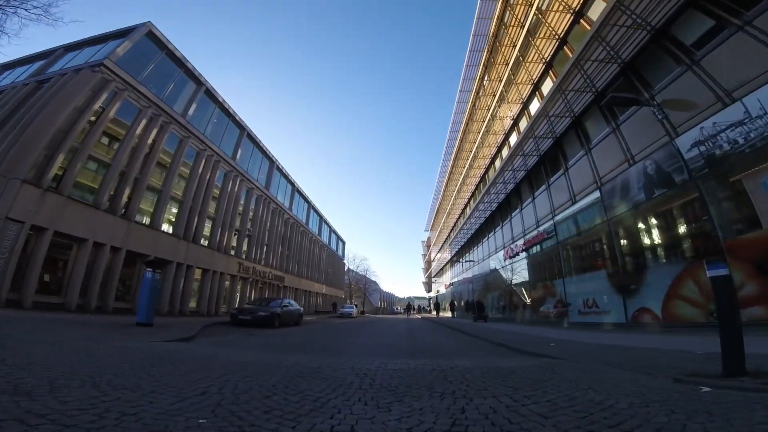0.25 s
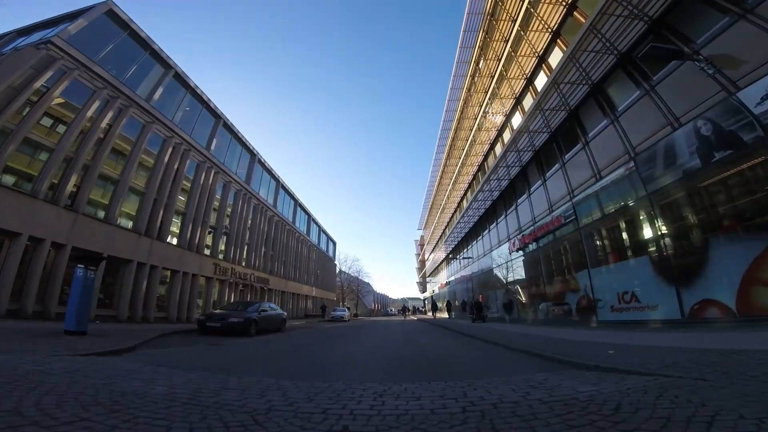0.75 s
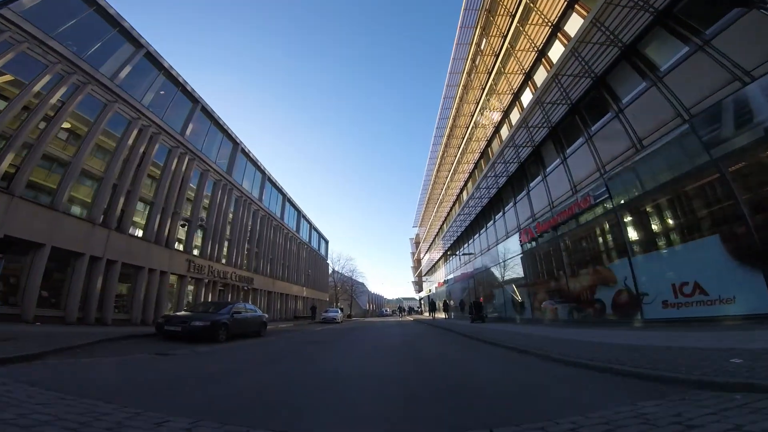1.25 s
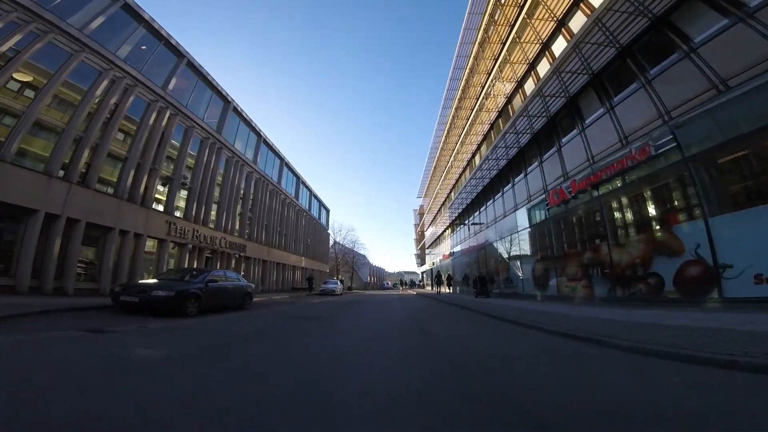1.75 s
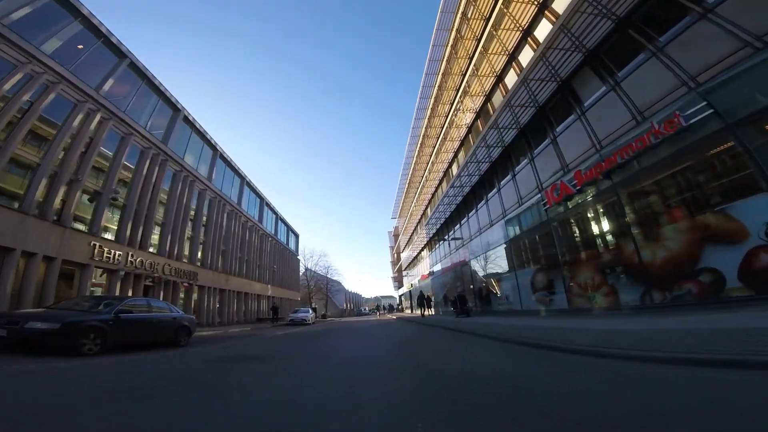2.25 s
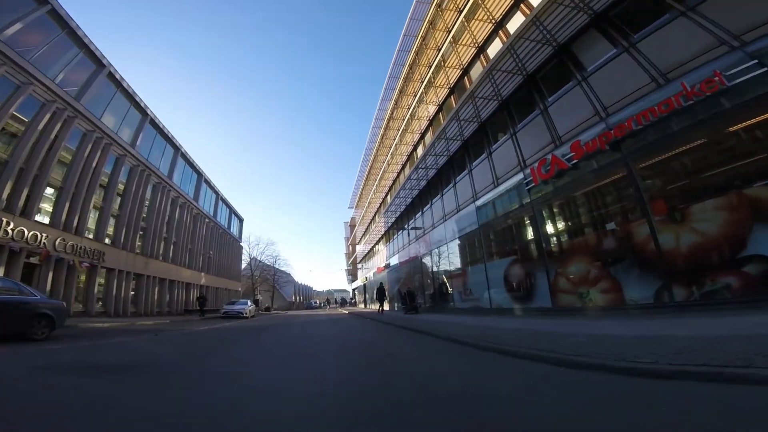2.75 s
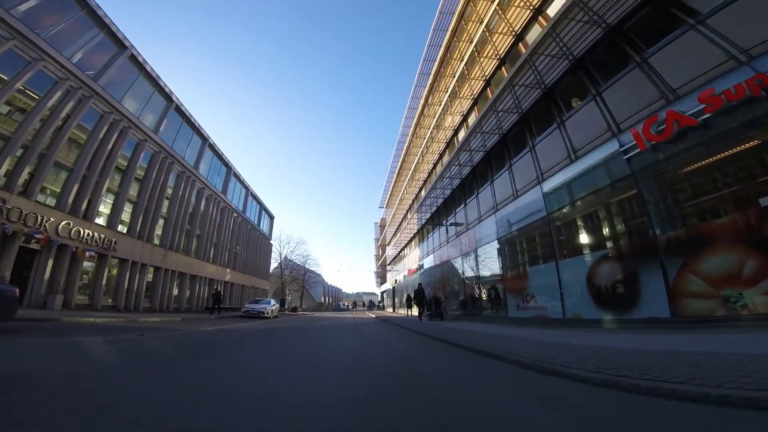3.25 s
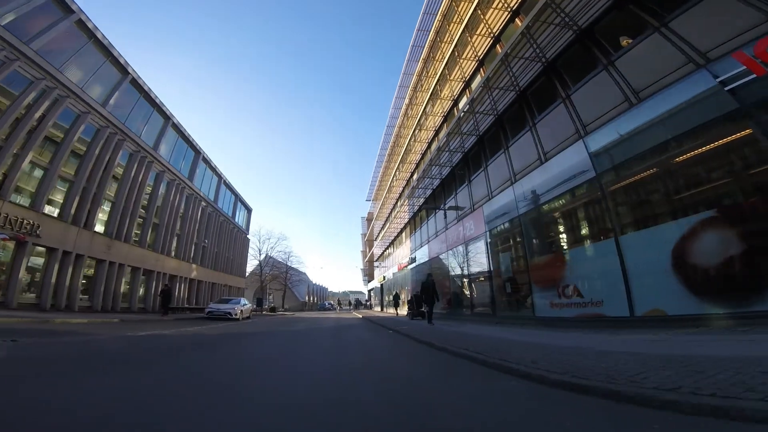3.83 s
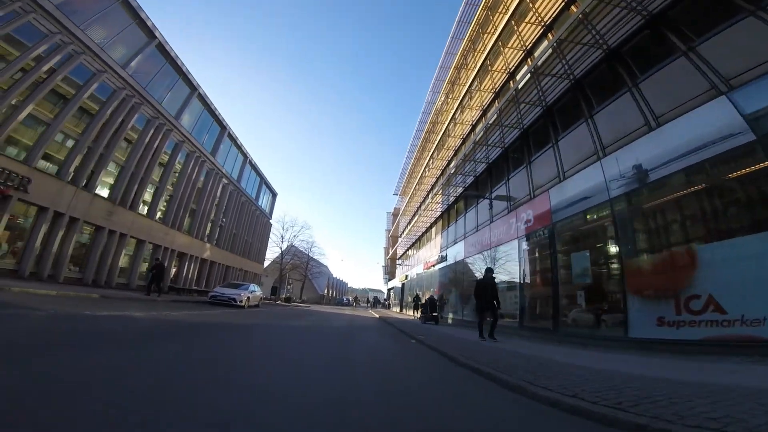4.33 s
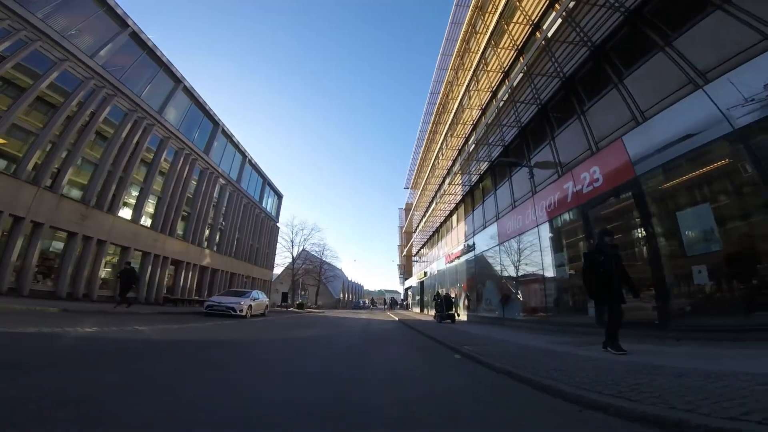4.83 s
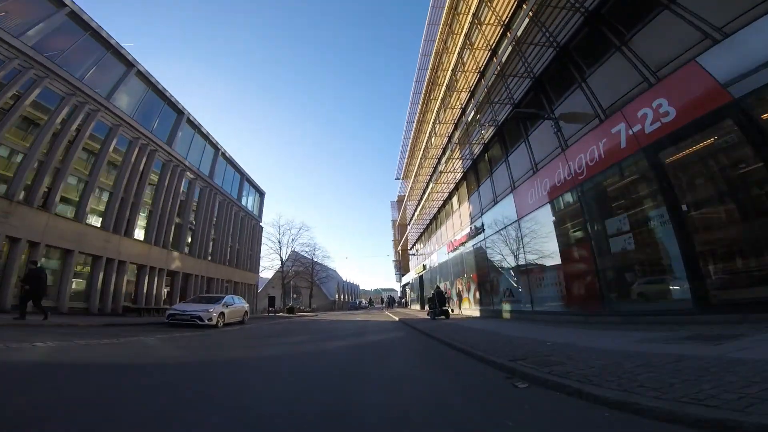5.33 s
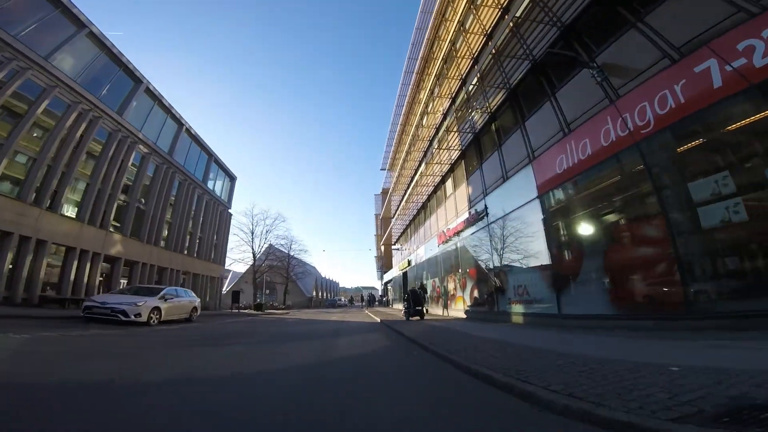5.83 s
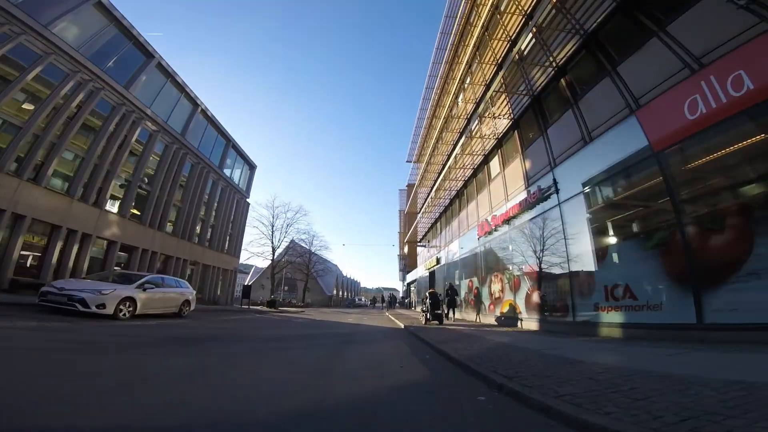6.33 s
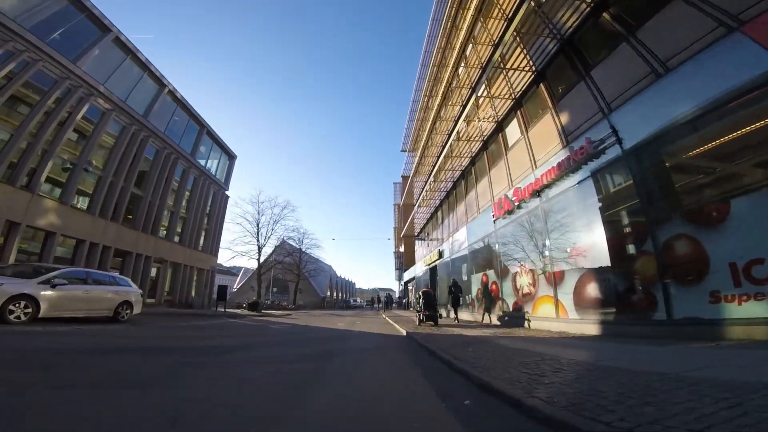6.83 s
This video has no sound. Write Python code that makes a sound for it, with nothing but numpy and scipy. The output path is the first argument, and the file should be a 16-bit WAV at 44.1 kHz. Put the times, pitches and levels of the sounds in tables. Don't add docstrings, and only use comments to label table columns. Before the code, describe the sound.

Muffled, bass-heavy bike ride outdoors, mono and very close. Cobblestones jolt the tyre in irregular deep thumps while the frame buzzes and cables and chain tick. After about two seconds the jolts stop, and smooth rolling rumble with a wavering low tread hum continues, wind softer, slightly louder rolling with speed, punctuated by a few hard clicks of grit on the frame.

```python
import sys
import numpy as np
from scipy import signal
from scipy.io import wavfile
from scipy.ndimage import uniform_filter1d

SR = 44100
rng = np.random.default_rng(int(sys.argv[2]) if len(sys.argv) > 2 else 0)


def volts_from_decibels(level):
    exponent = np.asarray(level, float) / 20
    return 10 ** exponent


def dump(signal):
    limited = np.clip(np.atleast_2d(signal).T, -1, 1)
    pcm = np.round(limited * 32767).astype(np.int16)
    wavfile.write(sys.argv[1], SR, pcm)


N = 312228

# (time [s], level [dB])
GUSTS = [(0.0, -24), (0.49, -24.5), (0.51, -20), (1.01, -25), (1.06, -26), (1.14, -22), (2.13, -24.5),
         (2.29, -37), (3.98, -38), (4.12, -25.5), (4.77, -33), (5.19, -32), (5.54, -33), (5.58, -27.5),
         (6.53, -32.5), (6.56, -25), (6.62, -31), (7.08, -32.5)]
# (time [s], block rate [Hz], level [dB])
TREAD = [(0, 120, -35), (.3, 116.8, -22), (.55, 122, -23.5), (.75, 122.3, -62.5), (2.8, 110.6, -62),
         (3.1, 107.8, -29.5), (3.4, 108.7, -26), (3.65, 111.1, -44), (3.9, 112.5, -22), (4.3, 112.8, -37.5),
         (4.8, 113.8, -31), (5.15, 118.6, -23.5), (5.5, 120, -35), (5.95, 120.6, -36), (6.5, 124.2, -26),
         (6.8, 128.7, -43), (7.08, 123.4, -24.5)]
# (time [s], rumble level [dB])
WHEEL_LOAD = [(0.0, -24), (0.41, -21.5), (0.99, -21.5), (1.06, -20), (1.73, -21), (1.79, -22.5),
              (1.85, -24), (1.93, -25), (2.31, -18), (2.33, -22.5), (2.76, -22), (2.86, -31), (2.96, -24.5),
              (5.36, -24), (5.38, -26), (6.88, -19.5), (6.96, -30.5), (7.08, -17)]
# (time [s], surge [dB])
BUMPS = [(.03, 4), (.15, 5.5), (.41, 5), (.57, 3.5), (.68, 3), (.79, 1.5), (1.159, 6.5), (1.25, 1),
         (1.35, 2.5), (1.46, 5.5), (1.7, 2.5), (1.931, 4.5), (2.09, 6.5), (2.212, 8), (3.19, 0.5),
         (4.49, 0.5), (5.049, 1), (5.48, 0.5), (5.82, 1), (6.05, 1), (6.23, 1.5), (6.58, 2.5), (6.8, 1.5)]
# (time [s], surge [dB])
SWELLS = [
    (.08, 2),
    (.73, 2.5),
    (1.1, 2.5),
    (1.21, 3.5),
    (1.32, 3),
    (1.42, 1),
    (1.99, 1),
    (2.12, -2),
    (5.82, 2),
    (6.53, 2),
]
# (frequency [Hz], width [Hz], peak level [dB])
TYRE_MODES = [(77.6, 30, -6), (95.5, 26.6, 0), (120, 33, 1), (148.9, 23.6, -2)]
# (frequency [Hz], width [Hz], peak level [dB])
WALL_MODES = [(184, 61, 0), (234, 53, 0), (297.8, 40.6, -0.5), (348, 60, -4.5), (390.5, 42.6, -8.5)]
# (frequency [Hz], width [Hz], peak level [dB])
FRAME_MODES = [(484.2, 49, 0), (527.7, 35.3, 4), (566.8, 48, 0), (715, 150, -8), (806, 61, -6),
               (847, 360, -13.5), (1250, 700, -19.5), (1800, 1400, -23.5), (2253, 590, -23),
               (3080, 1470, -30.5)]
# (frequency [Hz], width [Hz], peak level [dB])
HOUSING_MODES = [(5150, 1300, 0), (6500, 610, 1.5), (7270, 2100, -7.5), (8250, 1800, -13.5)]
# (frequency [Hz], width [Hz], peak level [dB])
AIR_MODES = [(8660, 2000, -5), (11600, 1600, -11), (13000, 2000, -13)]
# (level [dB], extra on cobbles [dB], gain with speed [dB/s], share of each bump [ratio])
WALL_LAW = (-35.5, 1.5, 0.95, 0.98)
FRAME_LAW = (-48.5, 3.5, 1, 1.01)
ROLL_LAW = (-60, 1.5, 1.32, 0.97)
HOUSING_LAW = (-63, -0.5, 0.59, 1.14)
# (time [s], peak [dB], low modes [dB], centre [Hz])
PINGS = [(.0114, -26.5, 7, 1470), (.395, -32.5, -16, 1760), (1.1113, -27.5, 1, 1800),
         (2.0344, -27.5, 8, 1390), (2.574, -26.5, 0.5, 1280), (2.7994, -26.5, 7.5, 1780),
         (3.0894, -48, -7, 1530), (4.5272, -16.5, 1, 1769), (5.0978, -19, -2, 2065),
         (5.8818, -39, 12, 1430), (6.3034, -27.5, 3.5, 1820), (6.789, -31.5, -5, 1760)]
# (time [s], peak [dB])
THUDS = [(.049, -13), (0.092, -12.5), (.434, -13), (.518, -11), (.558, -8), (0.652, -12), (0.673, -8),
         (0.765, -10.5), (1.081, -6), (1.142, -14), (1.163, -6.5), (1.188, -17), (1.403, -12), (1.462, -13),
         (1.543, -9), (1.684, -14), (1.777, -6.5), (1.932, -11), (2.044, -18), (2.061, -13), (2.202, -11),
         (2.288, -19.5), (7.054, -18)]
# (time [s], peak [dB], frame modes [dB], centre [Hz])
RATTLES = [(.06, -40.5, 2, 6560), (.088, -35, 2, 5360), (.19, -34, -6, 5300), (0.299, -38, -4, 4940),
           (.357, -49, 6, 6440), (0.428, -35.5, -2, 5470), (0.495, -38, 3, 5500), (0.723, -43, 1, 4750),
           (.745, -43.5, -6, 5270), (1.143, -39, 1, 6480), (1.162, -48.5, -17, 5450),
           (1.578, -42.5, 4, 6490), (1.7414, -41.5, 5, 5240), (1.902, -41, 2, 5160), (1.9306, -31, 4, 5400),
           (1.957, -43, 1, 6500), (1.9839, -46, -10, 5150), (2.017, -47, 11.5, 6540),
           (2.1141, -43.5, 9, 5330), (2.188, -46, -7, 6740), (2.202, -40, 6, 5500), (2.696, -36, -3, 6100),
           (3.58, -44, -18, 5610), (4.51, -43, 1, 5060), (4.56, -47, -13, 6490), (5.494, -42.5, -16, 6620),
           (6.072, -48, -2, 5260), (6.121, -47, 9, 5270), (6.364, -43, -2, 6910), (6.915, -47.5, -15, 5600)]
# (time [s], peak [dB], low modes [dB], centre [Hz])
KNOCKS = [(.1527, -52, 18, 1340), (.2406, -57, 11, 1430), (.351, -31, 5.5, 1710), (.426, -30, -10, 2110),
          (.4957, -40, 14.5, 1660), (.6924, -39, 8.5, 1290), (.7904, -39.5, 10, 1250),
          (.925, -43, -14, 2500), (1.029, -38, -15, 2500), (1.0555, -50, 21, 1290), (1.1377, -47, 4, 1910),
          (1.354, -38, -7, 2500), (1.4107, -34.5, 4, 2400), (1.454, -28, 7, 1280),
          (1.5508, -35.5, -3, 1370), (1.5797, -33, 7, 1500), (1.678, -35, 2, 2090), (1.915, -36, -15, 2400),
          (1.9289, -29, 13.5, 1800), (1.9427, -23.5, 8.5, 1340), (2.0192, -35, 17, 2450),
          (2.109, -28.5, 10, 1600), (2.1966, -30, 4, 1250), (2.2544, -37.5, 7, 1250),
          (2.269, -33.5, 6, 1370), (2.436, -37, -5, 1260), (.967, -43, -9, 2300), (3.9994, -50, 16, 1297),
          (5.5154, -41.5, 15.5, 1321), (6.022, -35, -7, 2300)]
# (frequency [Hz], level [dB], t60 [s])
PING_MID = [(1130, -8, 0.013), (1326, -5.5, 0.027), (1760, -2.5, 0.019), (2030, -9.5, .065),
            (1950, -4.5, .01), (2450, -6, .015), (2840, -16, .012)]
# (frequency [Hz], level [dB], t60 [s])
RATTLE_MID = [(2140, -3.5, 0.011), (2550, 1.5, 0.013), (3180, -6, 0.013)]
RATTLE_HIGH = [(4060, -3.5, 0.0056), (5200, -12, .012), (5490, 11, 0.004), (5700, -9, 0.0059),
               (6540, 6, 0.0081), (7120, -1.5, .012), (8240, -8, 0.0023), (8750, -4, 0.012)]
# (frequency [Hz], level [dB], t60 [s])
KNOCK_LOW = [(418, -1, 0.022), (541, 0.5, 0.084), (729, -2.5, 0.05), (845, 2.5, 0.028), (902, -5, 0.014),
             (1005, -15, 0.039)]
KNOCK_MID = [(1120, -16, 0.017), (1340, -3, 0.026), (1550, -13, 0.019), (1804, -3, 0.016),
             (2013, -12.5, 0.045), (1950, -8, 0.0022), (2450, -6, 0.018), (2760, -22, 0.0096)]
KNOCK_HIGH = [(3355, 5, 0.01), (3740, 5, 0.0088), (4570, -2.5, 0.013), (5050, 4.5, 0.019),
              (6400, 1.5, 0.014)]

COBBLES_END_S, COBBLES_FADE_S = 1.65, 0.058
BUMP_RISE_S, BUMP_FALL_S = 0.1, 0.091
THUD_HZ, THUD_T60_S, THUD_CONTACT_S = 99.7, 0.043, 0.0037
RATTLE_S, RATTLE_FADE_DB = .011, 7
STREAK_FROM_HZ, STREAK_FULL_HZ, STREAK_DB, STREAK_S = 7000, 10000, 12, .055
OVERLOAD_TOP, BASS_CUT_HZ = .65, 12


def rms_one(x):
    return x / np.sqrt(np.mean(x ** 2) + 1e-20)


def in_time(rows):
    s, *columns = np.transpose(rows)
    return [np.interp(np.arange(N) / SR, s, c) for c in columns]


def drift(rate):
    r = np.exp(-80 * np.pi * rate / SR)
    noise = rng.standard_normal(N // 40 + 2002)
    slow = signal.lfilter([1], [1, -2 * r, r * r], noise)[2000:]
    return np.interp(np.arange(N) / 40, np.arange(len(slow)), rms_one(slow))


def wind():
    (gust_db,) = in_time(GUSTS)
    band = signal.butter(2, [14, 62], "band", fs=SR, output="sos")
    eddies = signal.sosfilt(band, rng.standard_normal(N + SR))[SR:]
    return volts_from_decibels(gust_db) * rms_one(eddies)


def tread():
    hz, level_db = in_time(TREAD)
    phase = 2 * np.pi * np.cumsum(hz + .9 * drift(5)) / SR
    return np.sqrt(2) * volts_from_decibels(level_db + 0.29 * drift(1.3)) * np.sin(phase)


def bumps(rows):
    t = np.arange(N) / SR
    return sum(surge * np.interp(t, [s - BUMP_RISE_S, s, s + BUMP_FALL_S], [0, 1, 0]) for s, surge in rows)


def road_db(law, bump_db):
    level_db, cobbles_db, db_per_s, share = law
    since = np.arange(N) / SR - COBBLES_END_S
    on_cobbles = np.clip(1 - since / COBBLES_FADE_S, 0, 1)
    speeding_up = np.maximum(since, 0)
    return level_db + cobbles_db * on_cobbles + db_per_s * speeding_up + share * bump_db


def resonance(x, hz, width):
    r = np.exp(-np.pi * width / SR)
    b = (1 - r * r) / 2 * np.array([1, 0, -1])
    a = [1, -2 * r * np.cos(2 * np.pi * hz / SR), r * r]
    return signal.sosfilt([np.r_[b, a]] * 2, x)


def shaken(modes, jolt, own_db, grit_per_s, grit_db):
    pop_height = volts_from_decibels(2.8 * np.minimum(rng.exponential(1, N), 3))
    pops = (rng.random(N) < grit_per_s / SR) * pop_height
    out = 0
    for hz, width, top_db in modes:
        drive = rng.standard_normal(N) * (1 + volts_from_decibels(grit_db) * pops)
        force = drive * volts_from_decibels(jolt + own_db * drift(9.6))
        out = out + volts_from_decibels(top_db) * resonance(force, hz, width)
    return rms_one(out)


def tyre_rumble(jolt, bump_db):
    (load_db,) = in_time(WHEEL_LOAD)
    shake = shaken(TYRE_MODES, 0.29 * jolt, own_db=1.27, grit_per_s=59, grit_db=7.5)
    return volts_from_decibels(load_db - 2.5 + 0.37 * bump_db) * shake


def wall_drone(jolt, bump_db):
    shake = shaken(WALL_MODES, 1.1 * jolt, own_db=0.54, grit_per_s=38, grit_db=-14)
    return volts_from_decibels(road_db(WALL_LAW, bump_db)) * shake


def frame_buzz(jolt, bump_db):
    shake = shaken(FRAME_MODES[:6], 1.4 * jolt, own_db=1.1, grit_per_s=65, grit_db=15)
    return volts_from_decibels(road_db(FRAME_LAW, bump_db)) * shake


def rolling(jolt, bump_db):
    shake = shaken(FRAME_MODES[6:], 1.3 * jolt, own_db=0.2, grit_per_s=120, grit_db=9)
    return volts_from_decibels(road_db(ROLL_LAW, bump_db)) * shake


def housing_hiss(jolt, bump_db):
    shake = shaken(HOUSING_MODES, 0.67 * jolt, own_db=0, grit_per_s=240, grit_db=9)
    return volts_from_decibels(road_db(HOUSING_LAW, bump_db) + bumps(SWELLS)) * shake


def air():
    return volts_from_decibels(-74) * shaken(AIR_MODES, 0, own_db=0, grit_per_s=20, grit_db=-12)


def ring(clicks, hz, t60):
    r = volts_from_decibels(-60 / (max(t60, .002) * SR))
    w = 2 * np.pi * hz / SR
    return signal.lfilter([0, np.sin(w)], [1, -2 * r * np.cos(w), r * r], clicks + 1e-18)


def struck(times, levels_db, modes, spread_db, centre_hz=None, focus_db=0, same_sign=False):
    at = np.minimum((times * SR).astype(int), N - 1)
    out = np.zeros(N)
    lucks = rng.uniform(-1, 1, (len(at), len(modes))).T
    for (hz, level_db, t60), luck in zip(modes, lucks):
        off_db = 0 if centre_hz is None else -focus_db * np.log2(hz / centre_hz) ** 2
        strength = volts_from_decibels(levels_db + level_db + off_db - spread_db * np.abs(luck))
        clicks = np.zeros(N)
        np.add.at(clicks, at, strength * (1 if same_sign else np.sign(luck)))
        out += ring(clicks, hz, t60)
    return out


def blows(rows, mid_modes, focus_db, high_db, rebound_db, same_sign=False):
    s, peak_db, low_db, centre_hz = np.transpose(rows)[:, :, None]
    late = np.cumsum(0.0024 + .005 * rng.random((len(rows), 3)), axis=1)
    late -= late[:, :1]
    times = (s + late).ravel()
    blow_db = peak_db + rebound_db * np.arange(3)
    mid = struck(times, blow_db.ravel() - 6, mid_modes, spread_db=4, centre_hz=np.repeat(centre_hz, 3),
                 focus_db=focus_db, same_sign=same_sign)
    mid = np.convolve(mid, np.hanning(12) / 4)[:N]
    low = struck(times + .001, (blow_db + low_db).ravel() - 9, KNOCK_LOW, spread_db=6)
    high = struck(times, blow_db.ravel() + high_db - 5, KNOCK_HIGH, spread_db=6)
    return mid + low + high


def pings():
    return blows(PINGS, PING_MID, focus_db=22, high_db=-23, rebound_db=-14, same_sign=True)


def thuds():
    s, peak_db = np.transpose(THUDS)
    clicks = np.zeros(N)
    clicks[(s * SR).astype(int)] = -volts_from_decibels(peak_db)
    contact = np.hanning(int(THUD_CONTACT_S * SR))
    return np.convolve(ring(clicks, THUD_HZ, THUD_T60_S), 2 * contact / contact.sum())[:N]


def rattles():
    s, peak_db, mid_db, centre_hz = np.transpose(RATTLES)[:, :, None]
    late = np.cumsum(rng.random((len(RATTLES), 9)), axis=1) / 4.5
    late -= late[:, :1]
    times = (s + RATTLE_S * late).ravel()
    levels_db = peak_db - 7.5 - RATTLE_FADE_DB * late
    high = struck(times, levels_db.ravel(), RATTLE_HIGH, spread_db=9,
                  centre_hz=np.repeat(centre_hz, 9), focus_db=28)
    return high + struck(times, (levels_db + mid_db).ravel(), RATTLE_MID, spread_db=9)


def knocks():
    return blows(KNOCKS, KNOCK_MID, focus_db=17, high_db=-15, rebound_db=-2)


def scene():
    bump_db = bumps(BUMPS)
    jolt = drift(22)
    shake = tyre_rumble(jolt, bump_db) + wall_drone(jolt, bump_db) + frame_buzz(jolt, bump_db)
    shake += rolling(jolt, bump_db) + housing_hiss(jolt, bump_db)
    hits = pings() + rattles() + knocks()
    dulling = signal.butter(2, 10000, fs=SR, output="sos")
    hits = signal.sosfilt(dulling, hits)
    return (wind() + tread() + shake + air() + thuds() + hits)[None]


def streaked(x):
    hz, s, cells = signal.stft(x, SR, nperseg=512)
    luck = uniform_filter1d(rng.standard_normal(cells.shape[-2:]), size=2, axis=0)
    for _ in range(2):
        luck = uniform_filter1d(luck, size=max(int(STREAK_S * SR / 256), 2), axis=1)
    treble = np.clip((hz - STREAK_FROM_HZ) / (STREAK_FULL_HZ - STREAK_FROM_HZ), 0, 1)[:, None]
    gain_db = STREAK_DB * treble * np.minimum(rms_one(luck), .3)
    return signal.istft(cells * volts_from_decibels(gain_db), SR, nperseg=512)[1][..., :N]


def top_cut(x):
    return signal.sosfilt(signal.butter(12, 14170, fs=SR, output="sos"), x)


def record(dry):
    bass_cut = signal.butter(1, BASS_CUT_HZ, "high", fs=SR, output="sos")
    dry = signal.sosfilt(bass_cut, dry)
    rounded = OVERLOAD_TOP * np.tanh(dry / OVERLOAD_TOP)
    close = np.minimum(.3 + (N - np.arange(N)) / (.004 * SR), 1)
    return top_cut(streaked(rounded) * close)


dry = scene()
out = record(dry)
dump(out)
```